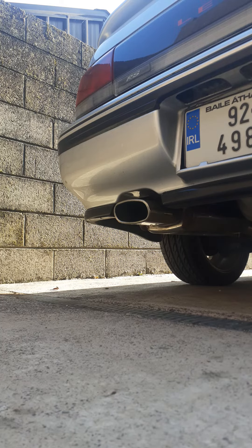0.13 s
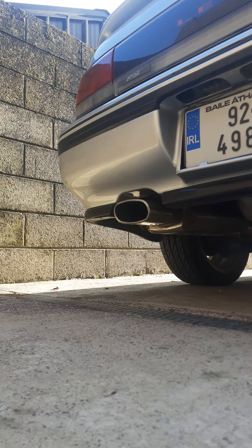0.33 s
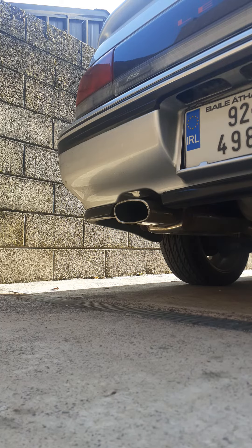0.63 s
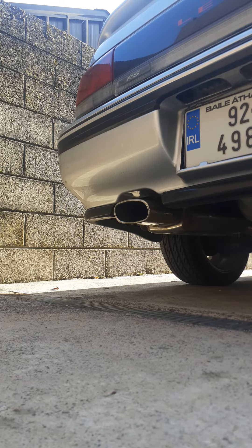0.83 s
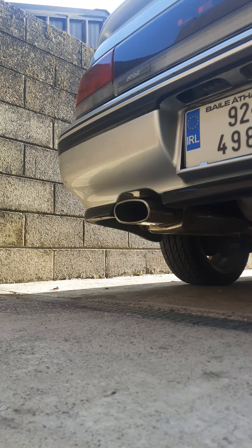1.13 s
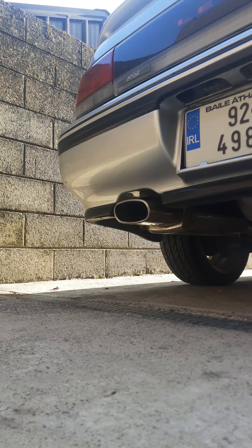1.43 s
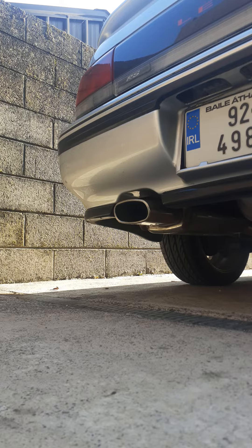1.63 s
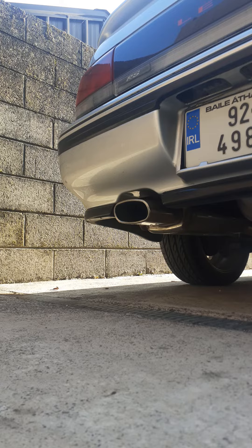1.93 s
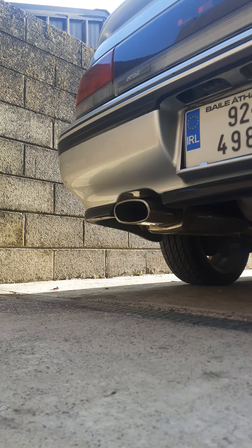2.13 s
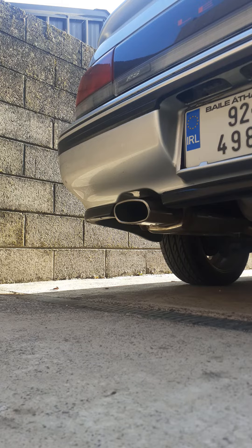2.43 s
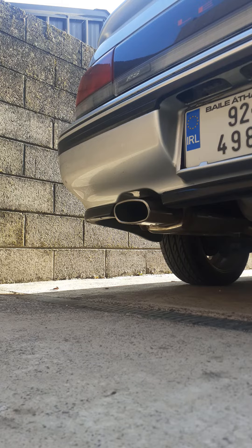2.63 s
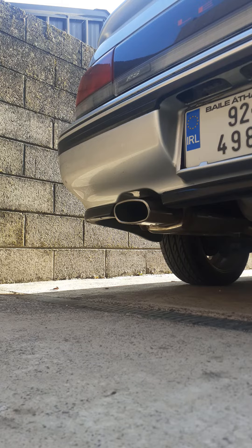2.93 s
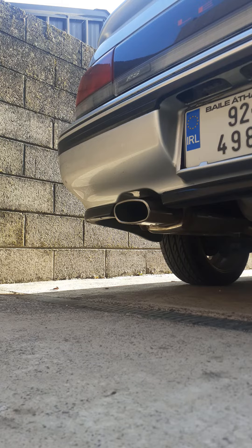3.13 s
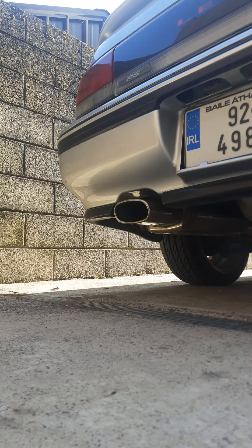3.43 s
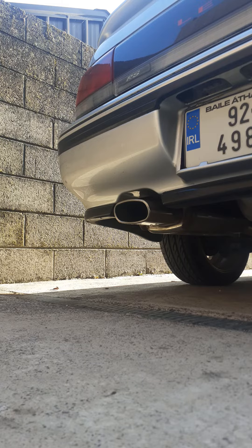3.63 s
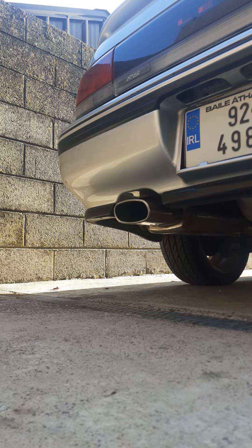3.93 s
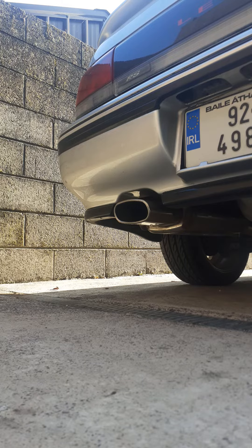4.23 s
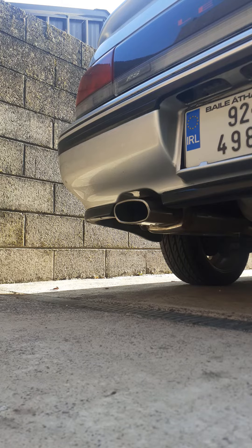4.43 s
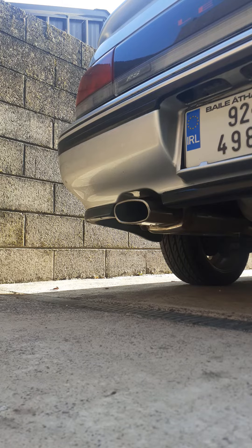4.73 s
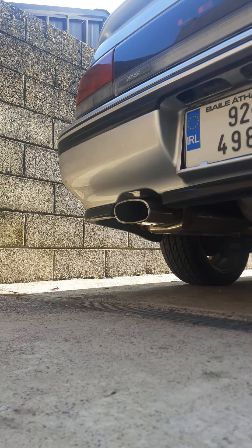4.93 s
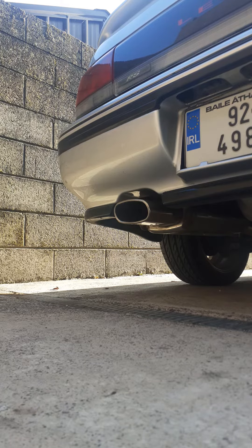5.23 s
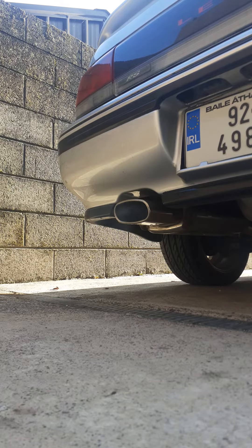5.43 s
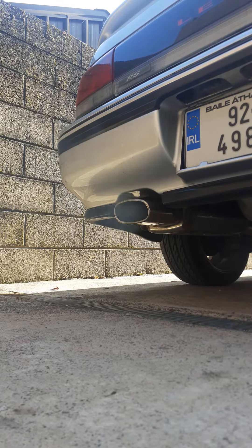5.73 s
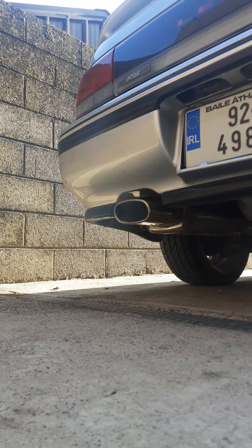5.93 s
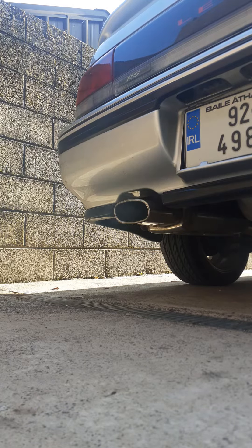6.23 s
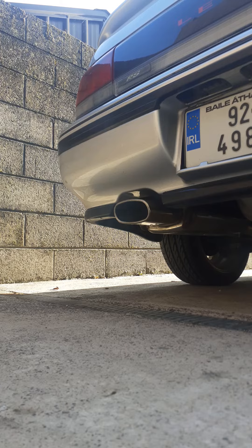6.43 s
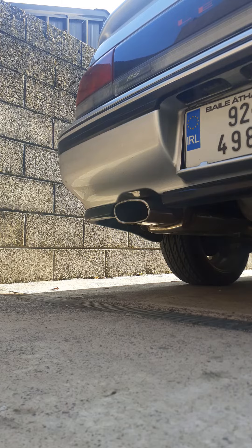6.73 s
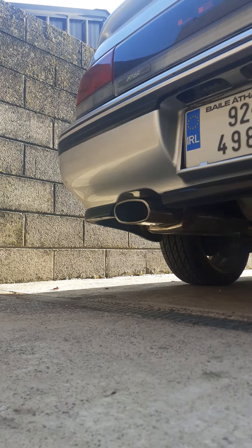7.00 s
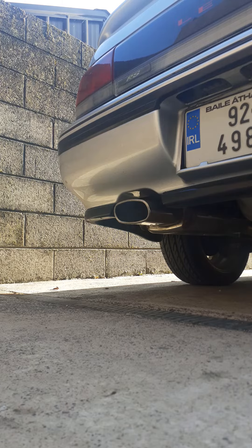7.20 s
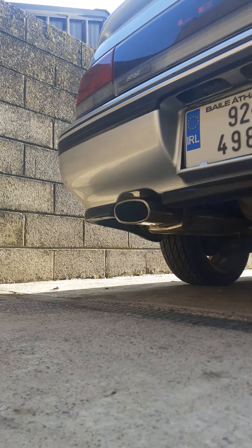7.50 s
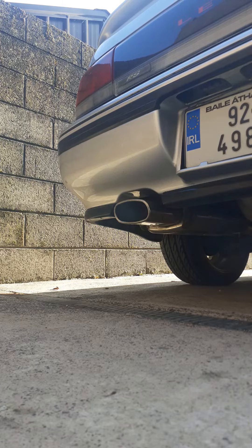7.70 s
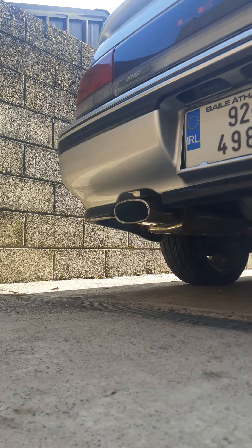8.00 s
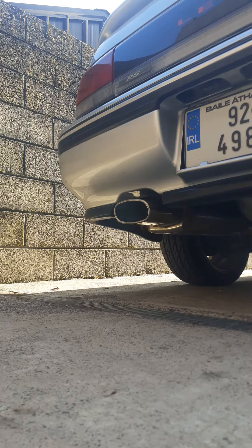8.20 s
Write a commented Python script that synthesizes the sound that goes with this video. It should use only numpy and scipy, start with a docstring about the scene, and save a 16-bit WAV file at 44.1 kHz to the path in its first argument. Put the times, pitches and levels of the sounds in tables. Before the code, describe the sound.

Heard from just behind a car's exhaust outdoors, a door thumps closed and echoes briefly. Birds trill and whistle over the faint whine of a fuel pump priming. Then the starter cranks with a short, harsh grind, the cold engine fires with a few booming pulses, and it rises to a steady, throbbing fast idle with ticking valves.

```python
"""A walled yard, just behind the tailpipe of a car whose cold flat-four is about to start.
A door shuts and rattles the panels, then the fuel pump whirs and primes under birdsong.
The starter's teeth grind through each compression; the engine catches, flares and settles to a fast
idle with ticking valves. Every firing rings the pipe and silencer. Each cylinder bank fires twice
in a row and one has a longer header, which gives the exhaust its burble."""
import sys
import numpy as np
from scipy import signal
from scipy.fft import rfft, irfft
from scipy.io import wavfile
from scipy.ndimage import uniform_filter1d

SR = 44100
rng = np.random.default_rng(int(sys.argv[2]) if len(sys.argv) > 2 else 0)


def file_out(sig):
    """Save sig as 16-bit WAV at sys.argv[1]."""
    # one column per channel
    cols = np.atleast_2d(sig).T
    # limit, then scale
    lim = np.clip(cols, -1, 1)
    pcm = np.round(lim * 32767).astype(np.int16)
    wavfile.write(sys.argv[1], SR, pcm)


N = 368676
TIME = np.arange(N) / SR
# cues: the pinion meets the ring gear, cranking begins, the engine outruns the starter
ENGAGE_S, CRANK_S, OVERRUN_S = 3.896, 3.92, 4.34
CATCH_S, RELEASE_S = 4.3805, 4.846  # the first firing; the key is let go
SLACK_S = 4.135  # between compressions the piston springs over the top and the teeth go slack
MESH_PER_HUM = 4.42  # the starter's tooth pitch over its armature hum


def undb(db):
    """Decibels to gain."""
    return 10 ** (np.asarray(db) / 20)


def unit(x):
    """Scale to rms 1."""
    return x / np.sqrt(np.mean(x ** 2))


def ramp(start, length):
    """Straight rise from 0 to 1."""
    return np.clip((TIME - start) / length, 0, 1)


def bump(centre, half_width):
    """A smooth swell to 1 and back."""
    return np.exp(-((TIME - centre) / half_width) ** 2)


def approach(start, lag):
    """Rise from 0 towards 1, ever more slowly."""
    return 1 - np.exp(-np.maximum(TIME - start, 0) / lag)


def noise():
    """White noise."""
    return rng.standard_normal(N)


def walk(rate):
    """Random drift of rms 1, with rate new values a second."""
    hold = int(SR / rate)
    steps = np.repeat(noise()[:N // hold + 1], hold)
    return unit(uniform_filter1d(steps, hold)[:N])


def clicks(times, sizes):
    """Impulses at the given times."""
    return np.bincount(np.clip(times * SR, 0, N).astype(int), sizes, N + 1)[:N]


def colour(x, points):
    """EQ through points of f/Hz, gain/dB."""
    hz, db = np.transpose(points)
    bin_hz = np.fft.rfftfreq(2 * N, 1 / SR) + 1e-6
    gain = undb(np.interp(np.log(bin_hz), np.log(hz), db))
    return irfft(rfft(x, 2 * N) * gain)[:N]


def lowpass(x, hz):
    """Steep low-pass."""
    return signal.sosfilt(signal.butter(4, hz, fs=SR, output="sos"), x)


def ring(x, hz, width):
    """One resonance, gain 1 at its centre."""
    return signal.lfilter(*signal.iirpeak(hz, hz / width, fs=SR), x)


def resonate(x, modes):
    """A bank of resonances: f/Hz, width/Hz, gain/dB."""
    return sum(undb(db) * ring(x, hz, width) for hz, width, db in modes)


def noise_band(hz, width):
    """A soft band of noise at rms 1."""
    return unit(ring(ring(noise(), hz, width), hz, width))


def diffuse(points):
    """Wide coloured noise, unrelated in left and right."""
    return np.array([unit(colour(noise(), points)) for _ in range(2)])


def chirp(start, length, from_hz, to_hz, db, waver_hz, arch=0):
    """One note that swells and fades while its pitch slides, arches and wavers."""
    note = np.zeros(N)
    span = slice(int(start * SR), int((start + length) * SR))
    along = np.linspace(0, 1, len(note[span]))
    slide_hz = from_hz + (to_hz - from_hz) * along
    hz = slide_hz * (1 - arch * (2 * along - 1) ** 2) + waver_hz[span]
    note[span] = undb(db) * np.sin(np.pi * along) * np.sin(2 * np.pi * np.cumsum(hz) / SR)
    return note


def pan(x, db):
    """Place in stereo, with the left louder by db."""
    return x * undb(np.array([[db], [-db]]) / 2)


def yard(x, wet_db, t60, pan_db):
    """Direct sound plus dense, fading reflections off the walls."""
    response = rng.standard_normal((2, SR)) * undb(-60 * TIME[:SR] / t60)
    response *= undb(wet_db) / np.sqrt(np.sum(response ** 2, axis=1, keepdims=True))
    response[0, 3] += 1  # the direct sound reaches the left three samples late
    response[1, 0] += 1
    stereo = signal.fftconvolve(x[None], response, axes=1)[:, :N]
    return pan(stereo / np.hypot(1, undb(wet_db)), pan_db)


def outdoors(level_db=-66):
    """A faint, nearly steady bed of distant rumble."""
    # rumble spectrum: f/Hz, level/dB
    air = [(20, -41), (40, -19.5), (65, -6), (110, -6), (200, -10.5), (450, -14.5), (1000, -19),
           (2000, -32), (4000, -36), (7500, -33), (10000, -40), (15500, -32)]
    rumble = unit(colour(noise(), air)) * undb(level_db + walk(9))
    return yard(rumble, wet_db=-8, t60=.2, pan_db=3)


def far_calls():
    """Very distant calls, blurred by echoes until no clear pitch is left."""
    # calls: t/s, half width/s, level/dB
    calls = [(1.05, 0.13, -68), (1.88, .15, -66)]
    swell = sum(undb(db) * bump(s, half_width) for s, half_width, db in calls)
    return yard(swell * noise_band(hz=1715, width=170), wet_db=3, t60=.2, pan_db=0)


def birds(trill_end_hz=2758, pip_s=.0543, pip_fall_hz=484):
    """Hidden birds sing rough downward slurs, high pips and level whistles, smeared by the walls."""
    # a far bird repeats one call: t/s, level/dB
    call_cues = [(.93, -62), (1.25, -60), (1.749, -63.5)]
    # its syllables: delay/s, length/s, start f/Hz, end f/Hz, accent/dB
    syllables = [(0, 0.099, 4180, 3890, -4.5), (0.075, 0.0666, 3700, 3280, 0.5),
                 (0.128, 0.087, 3230, 3190, -7.5)]
    # slurs that all drop to one low note: t/s, length/s, top f/Hz, level/dB
    trill_notes = [(2.346, 0.068, 4920, -42), (2.414, 0.051, 4200, -50), (2.504, 0.033, 5110, -40),
                   (2.558, 0.034, 5760, -44), (2.597, 0.02, 4740, -37.5), (2.661, 0.045, 4660, -42),
                   (2.74, 0.05, 4920, -42.5), (2.798, 0.06, 4200, -46), (2.879, 0.039, 4010, -45.5)]
    # a small bird's falling pips: t/s, start f/Hz, level/dB
    pip_notes = [(1.91, 8300, -67), (2.29, 8700, -66), (3.097, 6960, -43), (3.146, 7170, -42.5),
                 (3.196, 7620, -39.5), (3.239, 7570, -44), (3.311, 7080, -52)]
    # slightly arched whistles: t/s, length/s, top f/Hz, level/dB
    whistle_notes = [(2.965, 0.13, 3490, -55), (3.125, 0.13, 3677, -56.5), (3.463, 0.25, 3478, -37.5)]
    warble, waver_hz, rasp = walk(700), 22 * walk(200), undb(3 * walk(250))
    calls = sum(chirp(s + delay, length, from_hz, to_hz, db + accent_db, 260 * warble)
                for s, db in call_cues for delay, length, from_hz, to_hz, accent_db in syllables)
    trill = sum(chirp(s, length, hz, trill_end_hz, db, 190 * warble)
                for s, length, hz, db in trill_notes)
    pips = sum(chirp(s, pip_s, hz, hz - pip_fall_hz, db, 70 * warble) for s, hz, db in pip_notes)
    whistles = sum(chirp(s, length, hz, hz, db, waver_hz, arch=.0523)
                   for s, length, hz, db in whistle_notes)
    song = rasp * (calls + trill + pips) + whistles
    near_blur = yard(song, wet_db=10, t60=.17, pan_db=-1)
    far_tail = yard(song, wet_db=4, t60=.61, pan_db=-1)
    return near_blur + undb(-2.5) * far_tail


def thumps():
    """Soft, dull swells of bass from the parked car."""
    # thumps: t/s, level/dB
    cues = [(.069, -47), (.5, -66), (1.009, -60), (1.92, -66)]
    swell = sum(undb(db) * bump(s, .038) for s, db in cues)
    return swell * noise_band(hz=100, width=90)


def knocks(rise_s=.0046, echo_s=.22):
    """Blows on the car rattle panels and trim; the yard answers and far walls return a thin echo."""
    # the door shuts, a latch ticks, the pump switches on: t/s, level/dB, t60/s
    hits = [(0.03, -27, .2), (0.042, -23.5, 0.25), (0.124, -36, 0.13), (.208, -46, 0.19), (.31, -53, 0.12),
            (1.112, -64, .06), (1.534, -61.5, 0.38)]
    # spectrum of the car body: f/Hz, level/dB
    body = [(25, -72), (55, -24.5), (130, -6.5), (210, -4), (320, -9), (413, -3), (540, -6.5), (720, -10),
            (2060, -18), (2700, -19), (4500, -19), (7800, -22.5), (9600, -44.5), (11600, -27),
            (15500, -41.5)]
    # panel modes that ring on: f/Hz, width/Hz, gain/dB
    panels = [(178, 87, -1), (415, 20, -5), (450, 16, -6), (532, 15, -1), (785, 40, -3)]
    shake = sum(ramp(s, rise_s) * undb(db - 60 * np.abs(TIME - s) / t60) for s, db, t60 in hits)
    blows = shake * unit(colour(noise(), body))
    blows = blows + resonate(blows, panels)
    answer = yard(lowpass(blows, 5500), wet_db=9.5, t60=.7, pan_db=1.5)
    thin = lowpass(ring(blows, 4300, 1910), 3500)
    delayed = np.pad(thin, (round(echo_s * SR), 0))[:N]
    echo = yard(delayed, wet_db=11, t60=.53, pan_db=-1)
    close = yard(blows, wet_db=-5.5, t60=.043, pan_db=0)
    return close + undb(-12) * answer + undb(-17) * echo


def fuel_pump(on_s=1.52, pressure_s=2.0, key_s=3.79, end_s=4.05, top_hz=4735, hum_db=-59.5):
    """A small motor in the tank spins up, sings on its commutator and churns the fuel."""
    # commutator harmonics 1 to 3: level/dB
    tones_db = [-67.5, -72.5, -58.5]
    # spectrum of the churning hum: f/Hz, level/dB
    churn = [(50, -27), (120, -36), (200, 0), (280, -4.5), (400, -2), (700, -8), (1300, -10.5),
             (1800, -9.5), (2200, -36), (4500, -12), (6000, -28.5), (10000, -26.5), (11500, -21.5),
             (13500, -6), (15500, -24)]
    # the pitch sags as pressure builds, then dives as the turning key draws the battery down
    hz = top_hz * approach(on_s, .058) - 125 * approach(pressure_s, .24)
    hz = hz - 1100 * np.clip(TIME - key_s, 0, end_s - key_s)
    phase = 2 * np.pi * np.cumsum(hz * (1 + .001 * walk(220))) / SR
    tank_db = 8 * np.exp(-((hz - top_hz) / 60) ** 2)  # the tank rings along at top pitch
    levels_db = [tones_db[0] + tank_db, *tones_db[1:]]
    whine = sum(undb(db + walk(30)) * np.sin(k * phase) for k, db in enumerate(levels_db, 1))
    flutter_db = 5 * walk(50) * bump(on_s + .1, .12)
    whine *= (hz / hz.max()) ** 5 * undb(flutter_db)
    hum = yard(undb(hum_db) * unit(colour(noise(), churn)), wet_db=-1.5, t60=.31, pan_db=.5)
    sputter_db = 4 * walk(48.9) * bump(on_s + .11, .19)  # until the fuel flows evenly
    running = ramp(on_s, .075) - ramp(end_s, .1)
    return (whine + hum * undb(sputter_db)) * running


def squeals():
    """The starter clutch and the belt each slip with a brief, nearly level tone."""
    # slips: t/s, length/s, f/Hz, level/dB
    slips = [(4.318, 0.04, 535, -29.5), (5.31, 0.21, 2160, -47)]
    waver_hz = 9 * walk(120)
    tones = sum(chirp(s, length, hz, hz, db, waver_hz) for s, length, hz, db in slips)
    return yard(tones, wet_db=-3, t60=.15, pan_db=0)


def engine_mounts(mesh_phase, drag, cranking):
    """The engine lurches on its mounts, which groan under load and carry the armature's hum."""
    # jolts as the starter takes up the load: t/s, level/dB
    jolts = [(3.928, -1.5), (3.947, 3), (3.998, 2.5), (4.03, -1), (4.275, -9)]
    # modes of the mounts: f/Hz, width/Hz, gain/dB
    modes = [(105, 9.9, -0.5), (222, 7.3, 4), (283, 19, -7)]
    times, jolt_db = np.transpose(jolts)
    clunk = lowpass(resonate(clicks(times, undb(23 + jolt_db)), modes), 400)
    hum = np.sin(mesh_phase / MESH_PER_HUM + .55 * walk(110))
    hum *= undb(-36 + 3 * walk(70) - 11 * bump(SLACK_S, .027))
    groan = unit(ring(ring(noise(), 91, 55), 89, 80))
    groan *= undb(-43 + 22 * (drag - drag.max()))
    return yard(clunk + cranking * (hum + groan), wet_db=-13, t60=.11, pan_db=3)


def starter_motion(free_hz=1660, spin_up_s=.15, coast_hz_per_s=2000):
    """Tooth pitch in Hz as the starter cranks, spins free and coasts; the share lost to drag."""
    # tooth pitch, held back by one compression, racing over the top, held by the next: t/s, f/Hz
    cranking_pitch = [(3.92, 821), (3.96, 880), (4, 950), (4.05, 998), (4.085, 1035), (4.11, 1210),
                      (4.135, 1340), (4.17, 1350), (4.21, 1300), (4.24, 1140), (4.27, 985), (4.3, 911),
                      (4.34, 940)]
    hz = np.interp(TIME, *np.transpose(cranking_pitch))
    hz = hz + (free_hz - hz) * approach(OVERRUN_S, spin_up_s)
    drag = (1 - hz / free_hz) * ramp(CRANK_S, .017)
    coasting_s = np.maximum(TIME - RELEASE_S, 0)
    return np.maximum(hz - coast_hz_per_s * coasting_s, 1), drag


def starter(grind_db=-28, whine_db=-34, strain_hz=2600, fade_db_per_s=22):
    """Pinion teeth grind on the ring gear, slowing at each compression, then spin free and run down."""
    # spectrum of the grinding: f/Hz, level/dB
    grind_eq = [(53, -17.5), (95, -14), (160, -42), (225, -9), (400, -20.5), (540, -10.5), (730, -9),
                (1030, -6), (1500, -10), (2000, -11.5), (4500, -9), (6400, -7.5), (7900, -6.5), (9200, -20),
                (10800, -15.5), (13000, -16), (15500, -18.5)]
    # colour of the gear whine: f/Hz, gain/dB
    whine_eq = [(900, 0), (1350, -1.5), (1900, -2), (2700, -4), (4000, -4), (5200, -7), (6800, -5),
                (7400, -5), (7950, 3), (8600, -9), (9600, -16), (10900, -3), (12000, -15), (15500, -25)]
    # bell housing modes: f/Hz, width/Hz, gain/dB
    housing_modes = [(994, 27, 0), (1086, 22, 1), (1303, 30, -3), (1372, 32, 0), (1772, 27, 0),
                     (1910, 22, 0)]
    mesh_hz, drag = starter_motion()
    # compressions load the teeth; then the running engine hammers the pinion until it is thrown out
    strain_db = 13 * drag - 16 * bump(SLACK_S, .055)
    strain_db += 3 * ramp(CATCH_S + .1, .037) - 14 * ramp(RELEASE_S, .033)
    # the teeth rattle louder as they race between compressions, and fade once the key is let go
    drive_db = 5.5 * bump(SLACK_S + .049, .089) - ramp(RELEASE_S, .018)
    drive_db -= fade_db_per_s * np.maximum(TIME - RELEASE_S, 0)
    phase = 2 * np.pi * np.cumsum(mesh_hz * (1 + .009 * walk(500))) / SR
    engaged = ramp(ENGAGE_S, .012) * (mesh_hz > 1)
    rasp = noise() * (1 + .18 * np.cos(phase / MESH_PER_HUM)) * undb(2 * walk(120))
    gears = unit(colour(rasp, grind_eq)) * undb(grind_db + drive_db - 1.5)
    # the teeth sing only while they drive the engine; strain lifts their lower harmonics
    cranking = ramp(CRANK_S, .067) - ramp(OVERRUN_S - .02, .023)
    teeth = sum(np.sin(k * phase + .6 * walk(200)) * undb(3 * walk(90)) for k in range(1, 13))
    whine = colour(teeth * cranking, whine_eq) * undb(whine_db + drive_db)
    low_whine = colour(whine, [(strain_hz, 0), (2 * strain_hz, -25)])
    whine += low_whine * (undb(.53 * strain_db) - 1)
    # loaded teeth shake the housing; unloaded ones only sizzle
    deep = colour(gears, [(strain_hz / 2, 0), (strain_hz, -2), (2 * strain_hz, -25)])
    sizzle = gears - deep
    housing = (deep + resonate(gears, housing_modes)) * undb(strain_db)
    scattered = diffuse(grind_eq) * undb(grind_db + drive_db - 7 + .075 * strain_db)
    grind = yard(engaged * (sizzle + housing), wet_db=-2.5, t60=.13, pan_db=-1) + engaged * scattered
    whine = yard(whine, wet_db=-2, t60=.086, pan_db=-.5)
    return grind + whine + engine_mounts(phase, drag, cranking)


def strokes(turns, per_turn):
    """Times of events spaced evenly around each crankshaft turn."""
    running = TIME >= CATCH_S
    event_turns = np.arange(int(turns[-1] * per_turn)) / per_turn
    return np.interp(event_turns, turns[running], TIME[running])


def alternator(rpm, turns, idle_db=-53, idle_rpm=1450, db_per_rpm=.022, poles_per_turn=49.4):
    """Belt-driven poles whine with a little slip, louder with speed."""
    charge_db = 2.5 * bump(5.5, .25)  # a swell as the battery begins to recharge
    level_db = idle_db + db_per_rpm * (rpm - idle_rpm) + charge_db
    phase = 2 * np.pi * poles_per_turn * turns + .7 * walk(70)
    return np.sin(phase) * undb(level_db + 1.5 * walk(25))


def engine_bay(turns, level_db=-44, tick_share=.24):
    """Valves and injectors tick over the rush of belts and intake, throbbing with the firings."""
    # spectrum of the clatter and rush: f/Hz, level/dB
    bay_eq = [(300, -3), (600, -3), (780, -1), (950, -12), (1150, -5.5), (1400, -7), (1900, -9.5),
              (3100, -12.5), (4300, -15), (5080, -10.5), (7270, -13), (9300, -22), (11600, -12),
              (15500, -18.5)]
    # covers and brackets rung by the valve gear: f/Hz, width/Hz, gain/dB
    covers = [(970, 25, 5.5), (1092, 48, 9), (1175, 18, 6.5), (3064, 49, 6), (3516, 41, 9), (4980, 170, 2),
              (6030, 59, -13), (7230, 110, 4)]
    times = strokes(turns, per_turn=8)
    accents_db = np.resize(2 * rng.standard_normal(16), len(times))  # repeats every two turns
    sizes = undb(accents_db + 2 * rng.standard_normal(len(times)))
    ticking = tick_share * unit(clicks(times, sizes)) + noise()
    ticking = ticking + resonate(ticking, covers)
    clatter = yard(unit(colour(ticking, bay_eq)), wet_db=3, t60=.36, pan_db=-3.5)
    rush = undb(-2) * diffuse(bay_eq)
    unoiled_db = 12.5 * bump(4.39, .48)  # louder until the oil reaches the valves
    throb = 1 + .13 * np.cos(2 * np.pi * 2 * turns)
    return (clatter + rush) * undb(level_db + unoiled_db) * throb


def firings(rpm, turns, header_lag_s=.0037, jitter_s=.00012):
    """Two firings a turn: pulses of the short- and long-header banks, and shoves on the silencer."""
    # first firings on fuel left from cranking, the second a miss: level/dB, shove (negative sucks back)
    first_firings = [(-5, 3.7), (-28, .5), (2, -1.2), (1.5, -2.4), (-2, 4.2), (-1, 5), (3, .5), (2.5, 0),
                     (1.5, -.7), (-2, 2.4), (1, -1.9), (1, .5)]
    # firing strength, surging in the run-up and easing past the overshoot: t/s, level/dB
    load = [(4.9, 1.5), (5.05, 1.7), (5.1, 3), (5.2, 0.6), (5.55, -0.15), (6.05, -2.1), (6.8, -0.26),
            (8.36, -0.5)]
    # the four cylinders in firing order: level/dB, lateness/ms
    cylinders = [(1.7, .1), (-2.3, -.4), (1.9, -.1), (-2.4, .1)]
    times = strokes(turns, per_turn=2)
    index = np.arange(len(times))
    size_chance, time_chance = rng.standard_normal((len(times), 2)).T
    on_long = index // 2 % 2  # two from one bank, then two from the other
    first_db, shove = np.pad(first_firings, ((0, len(times) - len(first_firings)), (0, 0))).T
    cylinder_db, late_ms = np.array(cylinders)[index % len(cylinders)].T
    running_db = np.interp(times, *np.transpose(load)) + cylinder_db
    level_db = np.where(index < len(first_firings), first_db, running_db)
    slowness = np.clip(1 - np.interp(times, TIME, rpm) / 1400, 0, 1)
    scatter_db = .52 + 5 * slowness  # the cold engine fires unevenly at low speed
    sizes = undb(level_db + scatter_db * size_chance)
    times = times + header_lag_s * on_long + late_ms / 1000 + jitter_s * time_chance
    return clicks(times, sizes * (1 - on_long)), clicks(times, sizes * on_long), clicks(times, shove)


def side_chambers(x):
    """Each side chamber of the silencer swallows its own note."""
    # chamber notches: f/Hz, width/Hz
    notches = [(368, 7.2), (498, 64)]
    for hz, width in notches:
        x = x - ring(x, hz, width)
    return x


def gas_puffs(pulses, level_db=-39.5, decay_s=.017):
    """Each slug of gas tears at the lip of the tailpipe."""
    flow = signal.lfilter([1], [1, -np.exp(-1 / (decay_s * SR))], pulses)
    # colour of a puff: f/Hz, gain/dB
    puff_eq = [(100, -106), (300, -10), (450, 8.5), (600, -2.5), (900, -20), (2000, -24.5), (8000, -38)]
    puffs = unit(colour(flow * noise(), puff_eq))
    # the engine pulls hardest just before top speed, then eases into the idle
    effort_db = 5 * bump(5.1, .028) - 1.5 * ramp(5.44, .19)
    return side_chambers(puffs * undb(level_db + effort_db))


def exhaust(rpm, turns, pipe_db=27.5, boom_db=36, boom_hz=62):
    """The firings of both banks ring the pipe and silencer and puff out of the tailpipe."""
    # pipe modes: f/Hz, width/Hz, signed weight of the short-header bank, of the long-header bank
    modes = [(55.5, 8.6, -3, -.1), (59.5, 8, -1.9, -1.9), (101.9, 50.2, 5.5, .2), (106.1, 21.7, -6.9, -6.3),
             (136.7, 31.6, -3.6, .1), (168.9, 18.5, 1, 1.7), (234.7, 46.1, 4.25, 3),
             (244.2, 45.6, -3.7, -2.5), (316.2, 15.4, -.5, .5), (343.6, 20.6, -.1, .5),
             (429, 36.2, .6, -.4), (467.1, 51.3, -.5, .2), (560.8, 43.9, .17, .17)]
    short, long, shoves = firings(rpm, turns)
    pipe = sum(ring(short_weight * short + long_weight * long, hz, width)
               for hz, width, short_weight, long_weight in modes)
    pipe = lowpass(side_chambers(pipe), 607)  # the silencer's packing rounds off every pulse
    # the slow first strokes push longer and make the silencer boom
    boom = ring(ring(shoves, boom_hz, 11.7), boom_hz, 72)
    # an open pipe radiates little of the deepest bass
    low_cut = signal.butter(2, 40, "high", fs=SR, output="sos")
    mouth = signal.sosfilt(low_cut, undb(pipe_db) * pipe - undb(boom_db) * boom)
    return pan(mouth + gas_puffs(short + long), db=3.5)


def scene():
    """The crankshaft drives exhaust, engine bay and alternator; the rest plays on its own cues."""
    # the crankshaft runs up, overshoots and settles: t/s, speed/rpm
    speed = [(4.38, 350.6), (4.5, 505), (4.6, 681.2), (4.7, 900.1), (4.85, 893.5), (5, 1147.7),
             (5.18, 1446.9), (5.3, 1536.9), (5.42, 1558.8), (5.6, 1500.1), (5.76, 1441.7), (6.1, 1454.4),
             (6.5, 1444.1), (7, 1467.3), (7.5, 1452.9), (8, 1465.5), (8.36, 1504.3)]
    rpm = np.interp(TIME, *np.transpose(speed))
    turns = np.cumsum(rpm * (TIME >= CATCH_S)) / (60 * SR)
    engine = exhaust(rpm, turns)
    engine += (engine_bay(turns) + alternator(rpm, turns)) * ramp(CATCH_S, .19)
    car = engine + starter() + squeals() + fuel_pump()
    return car + birds() + far_calls() + knocks() + thumps() + outdoors()


def record(dry, top_hz=15900):
    """The left side is a little duller than the right, and the very top is cut."""
    # treble shelf above 12 kHz: left gain/dB, right gain/dB
    treble_db = [-5, 0.4]
    shelved = np.array([colour(x, [(8500, 0), (12000, db)]) for x, db in zip(dry, treble_db)])
    return signal.sosfilt(signal.ellip(10, .2, 80, top_hz, fs=SR, output="sos"), shelved)


dry = scene()
out = record(dry)
file_out(out)
```